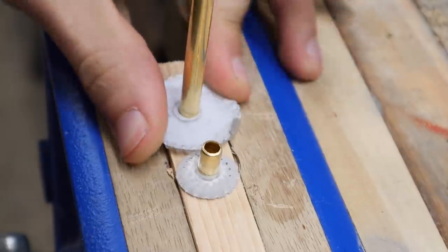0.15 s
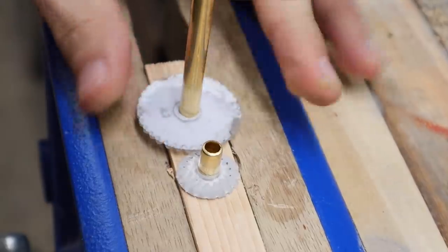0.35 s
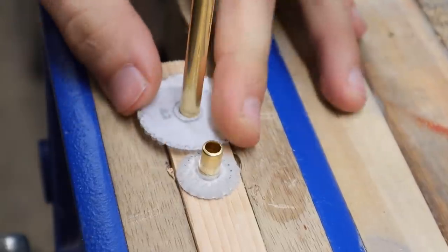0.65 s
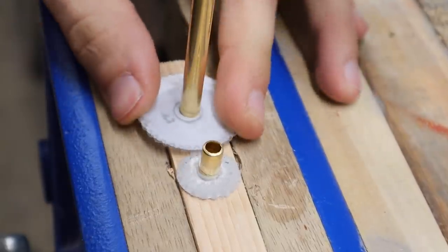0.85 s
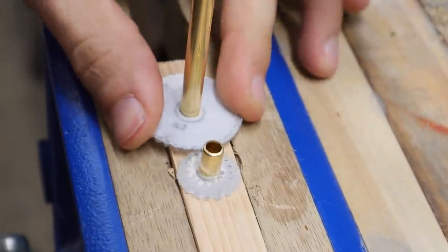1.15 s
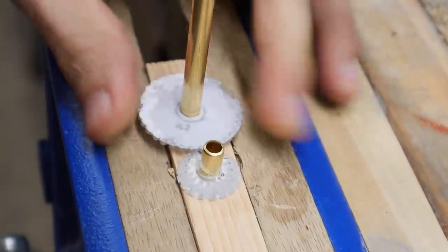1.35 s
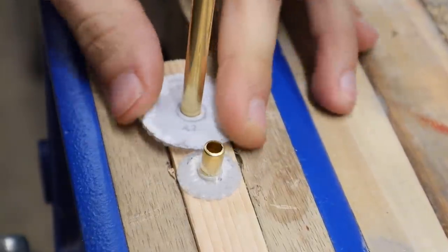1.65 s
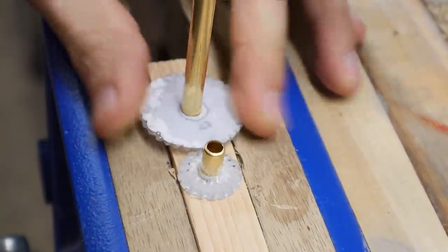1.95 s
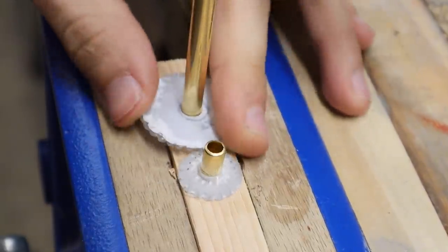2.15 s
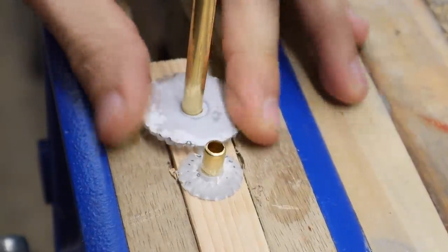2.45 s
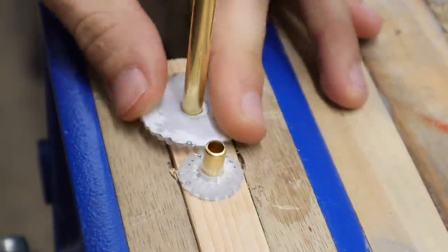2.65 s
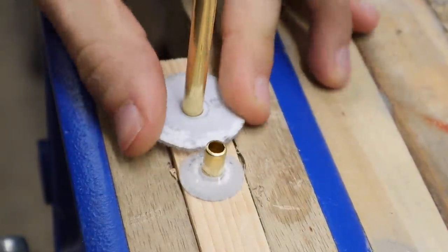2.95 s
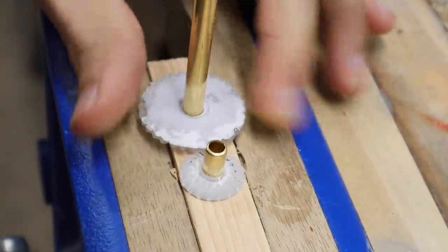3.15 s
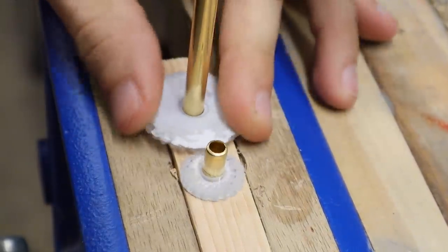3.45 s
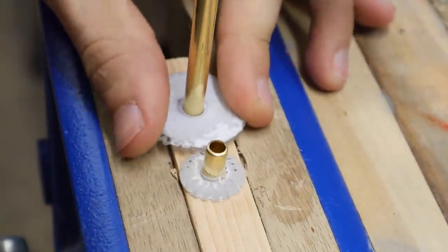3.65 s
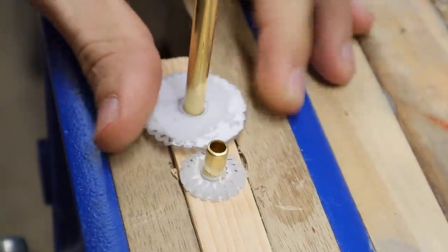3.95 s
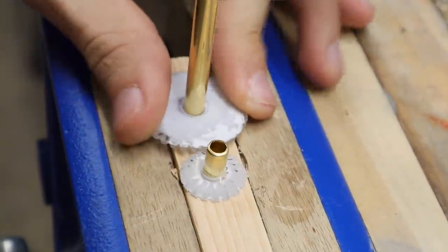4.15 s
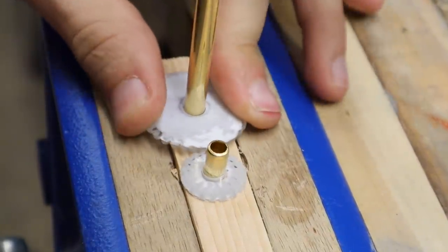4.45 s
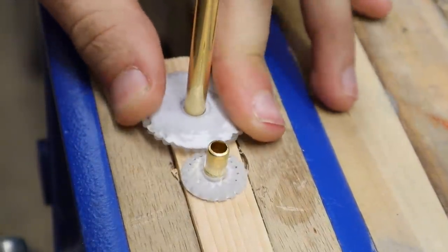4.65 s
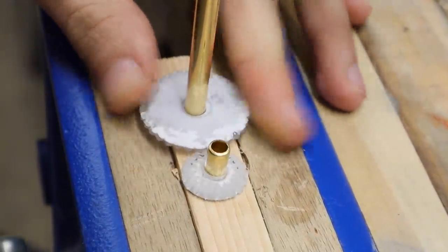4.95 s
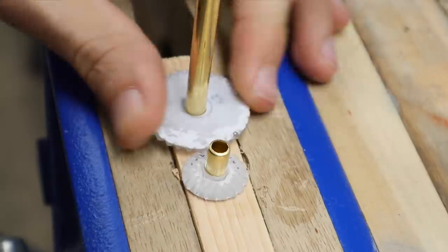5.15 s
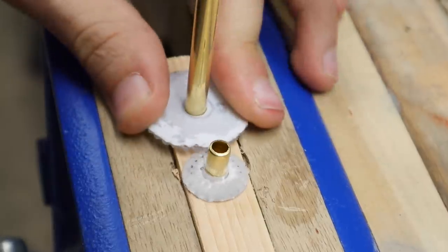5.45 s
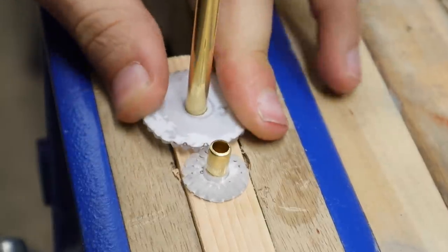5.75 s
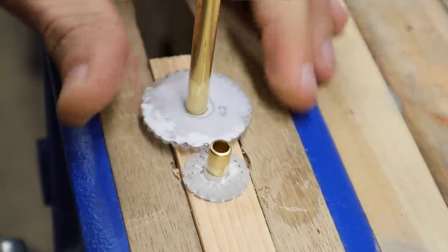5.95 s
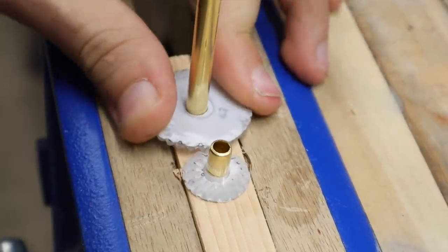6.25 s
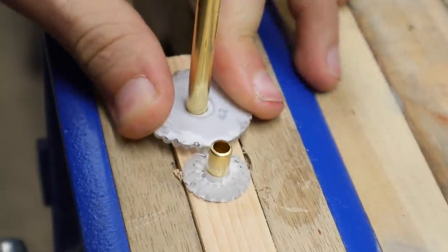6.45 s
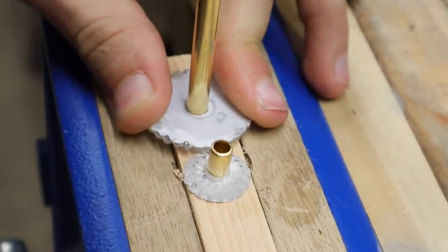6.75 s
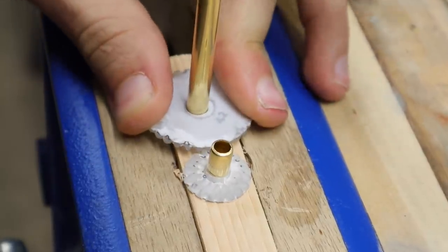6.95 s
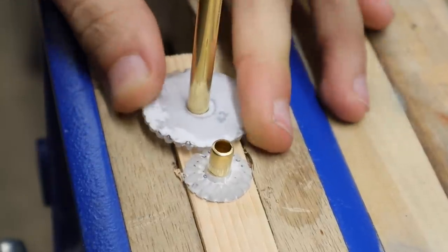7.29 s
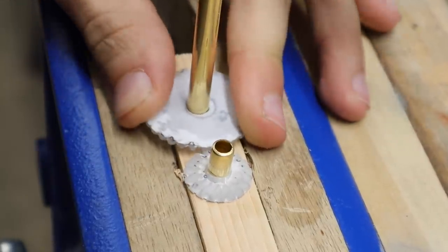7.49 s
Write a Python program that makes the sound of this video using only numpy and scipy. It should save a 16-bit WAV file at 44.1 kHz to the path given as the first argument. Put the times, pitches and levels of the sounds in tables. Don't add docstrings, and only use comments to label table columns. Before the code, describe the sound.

Rough hand-cut gears on brass tubes are turned by hand, teeth jamming and snapping free with sharp metallic clicks, wooden knocks and faint scrapes.

```python
import sys
import numpy as np
from scipy import signal
from scipy.fft import rfft, irfft
from scipy.io import wavfile
from scipy.ndimage import map_coordinates

SR = 44100
rng = np.random.default_rng(int(sys.argv[2]) if len(sys.argv) > 2 else 0)


def generate_wav(signal):
    frames = np.transpose(np.atleast_2d(signal))
    scaled = np.clip(frames, -1, 1) * 32767
    pcm = np.round(scaled).astype(np.int16)
    wavfile.write(sys.argv[1], SR, pcm)


def ratio(d):
    e = np.asarray(d, float) / 20
    return 10 ** e


N = 336042

# start in seconds, disc level in dB,
# share passed to the tubes in dB, hardness as the level change at the very top in dB.
TOOTH_SNAPS = [(0.2035, -11.5, -14, -16), (0.256, -34.5, -18, -18), (0.2664, -37, -22, -15),
               (0.446, -61, -2, -9), (0.4648, -41, -28, -22), (0.4777, -56, -18, 12), (0.9423, -61, 8, 9),
               (1.5232, -45.5, -27, -4), (2.1461, -41, -12, -11), (2.4397, -31, -17.5, -8.5),
               (2.6574, -40.5, -23, -20), (2.9228, -19, -11.5, -17), (2.9304, -29.5, -12, -19),
               (3.3284, -51, -7, 1), (3.4446, -49, -18, -20), (3.4735, -53, -12, -6),
               (3.5718, -31, -26, -28), (3.681, -59, -8, -5), (3.8149, -19, -17, -21),
               (4.1198, -54, -16, 8.5), (4.4644, -50.5, -4, -13), (4.9548, -23, -44, -23),
               (5.1364, -45, -11, -6), (5.157, -51, -3, -14), (5.471, -31, -14.5, -38),
               (6.0736, -40.5, -24, -9), (6.6999, -8, -8, -14.5), (7.231, -50, -12, -17)]
# pitch in Hz, level in dB, time to fall by 60 dB in seconds.
TUBE_MODES = [(1810, -13, .025), (1980, 0, .03), (2060, 0, .035), (2160, -1, .04), (2450, -1, .025),
              (2820, -6, .015)]
DISC_MODES = [(3100, -5, .012), (3270, -2, .02), (3520, 0, .025), (3700, -1, .025), (4150, -2, .025),
              (4450, -6, .012), (4720, -5, .015)]
RING_MODES = [(5150, -3, .016), (5330, 0, .02), (5600, -8, .008), (5950, -9, .008)]
TOP_MODES = [(6400, -4, .008), (6750, 0, .012), (7150, 0, .012), (7500, -3, .01), (8000, -3, .01),
             (8600, -6, .006), (9100, -6, .006), (10700, -3, .008), (12500, -6, .005)]
METAL_SPREAD_DB = 2


def snaps():
    out = np.zeros(N)
    for s, disc_db, tube_db, hard_db in TOOTH_SNAPS:
        force = np.diff(jolt(rise_s=.0004, fall_s=.0006))
        parts = [
            (-2.0, [*DISC_MODES, *crowd(2800, 5000, 0.41, 44.4)]),
            (0.47 * hard_db + 3.0, [*RING_MODES, *crowd(4800, 6500, -1.5, 35.0)]),
            (0.84 * hard_db + 1.0, [*TOP_MODES, *crowd(6603, 9460, 0.5, 73.0)]),
            (hard_db + 4.5, crowd(9500, 16000, 0, 43.0)),
            (tube_db + 9.5, [*TUBE_MODES, *crowd(1960, 2900, 4.0, 25.0)]),
        ]
        for level_db, modes in parts:
            ringing = peak_one(ring(force, modes, METAL_SPREAD_DB, swell_s=0.0012))
            add(out, s - .0002, ratio(disc_db + level_db) * ringing)
        add(out, s, ratio(disc_db - 23.5) * chatter())
    return out


def jolt(rise_s, fall_s):
    t = np.arange(int(.01 * SR)) / SR
    rise = (t / rise_s) ** 2 / (1 + (t / rise_s) ** 2)
    return grit(rise * np.exp(-t / fall_s), 15000, size_db=2.5)


def chatter():
    t60_s, band_hz = 0.093, (1300, 6470)
    t = np.arange(int(.2 * SR)) / SR
    shaking = rms_one(grit(np.ones(len(t)), 6000, size_db=-2.0))
    shaking = shaking * ratio(-60 * t / t60_s) * np.clip(t / 0.0022, 0, 1)
    return signal.sosfilt(signal.butter(1, band_hz, "band", fs=SR, output="sos"), shaking)


# start in seconds, bench level in dB, board level in dB,
# jig level in dB, favoured jig pitch in Hz.
WOOD_KNOCKS = [(0.203, -38.5, -27.5, -25, 1285), (0.467, -58, -62.5, -59, 1030),
               (0.944, -48.5, -51.5, -60, 1090), (1.520, -61, -60.5, -62, 1090),
               (2.15, -57.5, -78, -50.5, 1020), (2.439, -47, -59.5, -44.5, 990),
               (2.547, -50, -76, -69, 1080), (2.923, -41.5, -37.5, -30.5, 1320),
               (2.932, -79, -45, -35.5, 1150), (3.8155, -41.5, -43, -36.5, 1100),
               (4.466, -50, -50, -49, 1070), (4.774, -41.5, -62, -54.5, 1040), (4.953, -44, -51, -39, 1160),
               (5.150, -59, -64, -53, 1040), (5.471, -45, -49, -42, 1080),
               (6.7006, -25.5, -30.5, -23.5, 1120), (7.02, -62, -78, -70, 1070),
               (7.29, -48.5, -58.5, -43.5, 870), (7.578, -63, -57.5, -57, 1080)]
# pitch in Hz, level in dB, time to fall by 60 dB in seconds.
BENCH_MODES = [(70, -12, .25), (95, -8, .3), (140, -9, .2), (190, -6, .15), (225, -8, .12), (255, 1.5, .22),
               (280, -5, .16), (335, -4, .12)]
BOARD_MODES = [(372, -13, .08), (398, -9, .25), (409, 0, .32), (432, -14, .08)]
SLAT_MODES = [(464, 0, .11), (510, -1, .07), (560, -4, .06), (605, -1, .12), (715, -3, .1), (820, -5, .08)]
JIG_MODES = [(955, -4, .12), (1025, -4, .1), (1080, 0, .15), (1131, -4, .12), (1207, -1, .1),
             (1250, -5, .06), (1310, -4, .07), (1440, -4, .08), (1590, -8, .06)]


def knocks():
    free_hz, grip_octaves = 1084, 0.24
    out, push = np.zeros(N), np.ones(3)
    for s, bench_db, board_db, jig_db, jig_hz in WOOD_KNOCKS:
        held = np.clip((jig_hz / free_hz) ** (1 / grip_octaves), .6, 2.5)
        barely_held = held ** .4
        middle_db = (jig_db + bench_db) / 2
        parts = [
            (jig_db + 6.5, near(JIG_MODES, jig_hz, 0.21), held, .004),
            (middle_db + 3.0, SLAT_MODES, held, .0025),
            (jig_db - 0.5, crowd(1300, 1600, 0, 32.0), held, .0012),
            (middle_db + 5, crowd(200, 1000, 0, 7.7), 1, .0006),
            (board_db + 3.0, BOARD_MODES, barely_held, .019),
            (bench_db + 2.5, BENCH_MODES, barely_held, .007),
        ]
        for level_db, modes, damping, swell_s in parts:
            knock = ring(push, modes, 1.5, damping, swell_s)
            add(out, s, ratio(level_db) * peak_one(knock))
    return out


# start in seconds, length in seconds, level in dB,
# 5 kHz ring in dB.
FLANK_GRINDS = [(0.216, 0.1, -52, 5), (0.437, 0.052, -59, 1), (0.61, 0.023, -54, 0),
                (.694, 0.016, -57, -1.5), (0.834, 0.019, -54.5, 7), (0.942, 0.025, -52, 7.5),
                (1.028, .045, -58.5, 12), (1.155, .051, -60.5, 9), (1.274, 0.048, -60.5, 4),
                (1.596, 0.06, -50.5, 3), (1.848, 0.04, -48.5, 5), (1.894, .049, -52, 5.5),
                (2.146, 0.021, -50, -1), (2.231, 0.027, -58.5, -7), (2.356, .15, -62, 6),
                (2.46, 0.07, -57.5, 9), (2.646, .032, -53, 1.5), (3.012, .052, -58, 4),
                (3.125, 0.12, -61, 4), (3.616, 0.17, -59.5, 3), (4.1, .026, -53, 1.5),
                (4.336, 0.025, -59, 3), (4.44, .068, -62, 8), (4.751, 0.038, -53, 0), (4.938, .03, -55, 17),
                (5.144, 0.025, -51, 6), (6.077, .027, -58, -3), (7.288, 0.049, -47.5, -5)]


def grinds():
    out = np.zeros(N)
    for s, length_s, level_db, ring_db in FLANK_GRINDS:
        add(out, s, rub(length_s, level_db, 4400, 1, ring_db))
    return out


# start in seconds, length in seconds, level in dB, 5 kHz ring in dB.
FLANK_SKIDS = [
    (1.518, 0.015, -50, -4),
    (3.802, .008, -48, -3),
    (4.771, 0.012, -41, 6.5),
    (4.947, 0.0076, -38, -6),
    (5.483, 0.0067, -49, -8),
    (7.288, 0.0075, -40.5, 18),
]


def skids():
    out = np.zeros(N)
    for s, length_s, level_db, ring_db in FLANK_SKIDS:
        add(out, s, rub(length_s, level_db, 5050, 1.8, ring_db))
    return out


# start in seconds, length in seconds, level in dB, pitch in Hz,
# spread in octaves.
BURR_DRAGS = [(.467, 0.032, -46.5, 3050, 0.6), (1.614, .029, -42, 7100, 0.36),
              (1.666, .027, -44.5, 4200, 0.054), (2.74, 0.038, -52, 4150, 0.17),
              (3.317, 0.02, -51, 3680, .1), (3.558, .041, -42.5, 3920, 0.11), (3.827, .05, -54, 3500, .09),
              (4.96, .024, -61, 3640, .15), (5.177, .07, -47, 3170, 0.15), (6.665, 0.011, -45.5, 2200, .28),
              (6.721, 0.14, -51, 2300, 0.72), (7.295, 0.042, -46.5, 2140, 0.073)]


def drags():
    out = np.zeros(N)
    for s, length_s, level_db, pitch_hz, octaves in BURR_DRAGS:
        add(out, s, rub(length_s, level_db, pitch_hz, octaves, ring_db=-8))
    return out


def rub(length_s, level_db, favoured_hz, octaves, ring_db):
    progress = np.arange(int(.2 * SR)) / SR / max(length_s, .005)
    pressure = np.sin(np.pi * np.clip(progress, 0, 1) ** 0.55) ** .55 * (progress < 1)
    force = grit(pressure, 2200, size_db=1.0)
    force = force / np.sqrt(np.sum(force ** 2) / (length_s * SR) + 1e-12)
    modes = [*TUBE_MODES, *DISC_MODES, *TOP_MODES,
             *crowd(1520, 5000, -0.25, 25.0), *crowd(4970, 15000, -0.19, 52.0)]
    scrape = ratio(level_db - 31.0) * ring(force, near(modes, favoured_hz, octaves), METAL_SPREAD_DB)
    bright = ratio(level_db + ring_db - 31.0) * ring(force, RING_MODES, METAL_SPREAD_DB)
    out = np.zeros(max(len(scrape), len(bright)))
    out[:len(scrape)] += scrape
    out[:len(bright)] += bright
    return out


def ring(force, modes, spread_db, damping=1, swell_s=1e-5):
    hz, level_db, t60 = np.transpose(modes)[:, :, None]
    t = np.arange(int(np.max(t60) / damping * SR) + 9) / SR
    sign = (-1) ** np.round(hz / 50)
    strength = ratio(level_db + spread_db * rng.standard_normal(hz.shape)) * sign
    tones = strength * ratio(-60 * damping * t / t60) * np.sin(2 * np.pi * hz * t)
    swell = 1 - np.exp(-(t / swell_s) ** 2)
    return signal.fftconvolve(force, np.sum(tones, axis=0) * swell)


def crowd(low_hz, high_hz, level_db, cycles):
    count = 18
    place = (np.arange(count) + rng.random(count)) / count
    hz = low_hz * (high_hz / low_hz) ** place
    return [(f, level_db, cycles / f) for f in hz]


def near(modes, favoured_hz, octaves):
    modes = np.array(modes, float)
    distance = np.log2(modes[:, 0] / favoured_hz) / max(octaves, .05)
    modes[:, 1] -= np.minimum(3 * distance ** 2, 40)
    return modes


def grit(envelope, per_s, size_db):
    count = len(envelope)
    caught = rng.random(count) < per_s / SR
    sizes = ratio(size_db * np.minimum(rng.exponential(1, count), 4))
    return envelope * caught * sizes * rng.choice([-1, 1], count)


def add(track, s, sound):
    i = max(round(s * SR), 0)
    track[i:i + len(sound)] += sound[:N - i]


def peak_one(x):
    return x / (np.max(np.abs(x)) + 1e-20)


def rms_one(x):
    return x / np.sqrt(np.mean(x ** 2) + 1e-20)


# pitch in Hz, time to fall by 60 dB in seconds.
SHOP_DECAY = [(200, 0.24), (1000, 0.091), (3000, 0.14), (6000, 0.13), (12000, 0.12)]
# pitch in Hz, level in dB.
SHOP_TONE = [(200, 5.5), (1000, 11), (2000, 8), (3000, 2.5), (6000, -1.5), (7000, -14), (16000, -18)]


def shop(x):
    t = np.arange(int(.5 * SR)) / SR
    edges = 100 * 2 ** np.arange(0, 7.6, .5)
    white, tail = rng.standard_normal(len(t)), 0
    for low, high in zip(edges, edges[1:]):
        band = signal.sosfilt(signal.butter(2, [low, high], "band", fs=SR, output="sos"), white)
        tail = tail + band * ratio(at_hz(SHOP_TONE, low) - 60 * t / at_hz(SHOP_DECAY, low))
    tail = tail * np.clip((t - .003) / 0.00099, 0, 1)
    return signal.fftconvolve(x, tail / np.sqrt(np.sum(tail ** 2)))[:N]


# time in seconds, level in dB.
HUM_LOAD = [
    (0, -49.5),
    (.5, -52.5),
    (1.9, -52.5),
    (4.8, -54.5),
    (5.1, -50),
    (5.5, -52),
    (6.7, -49.5),
    (7.62, -51.5),
]
# multiple of the base pitch, level in dB.
WHINE_TONES = [
    (1, -59.5),
    (2, -76.5),
    (3, -75.5),
]
# pitch in Hz, width in Hz, level in dB.
DRONE_TONES = [
    (91.2, 2.8, -69),
    (1050, 0.93, -70.5),
]
# pitch in Hz, level in dB per Hz.
AIR_SPECTRUM = [(12, -27), (30, -12.5), (45, -15), (95, -13), (120, -15), (240, -16), (500, -21),
                (760, -19), (1000, -15.5), (1300, -20), (1700, -23.5), (4000, -29), (9000, -33.5),
                (16000, -33.5)]


def machines():
    hum_hz, whine_hz = 59.7, 853.1
    t = np.arange(N) / SR
    s, load_db = np.transpose(HUM_LOAD)
    hum_db = np.interp(t, s, load_db) + 2.0 + 2.2 * drift(3.6)
    hum = np.sin(2 * np.pi * hum_hz * t + 0.73 * drift(1.5)) * ratio(hum_db)
    whine = sum(ratio(db + 2.5) * np.sin(2 * np.pi * whine_hz * k * t + k) for k, db in WHINE_TONES)
    whine = whine * ratio(1.24 * drift(8.9))
    drones = np.zeros(N)
    for hz, width_hz, db in DRONE_TONES:
        level = ratio(db + 3 + 2 * drift(width_hz))
        drones += level * np.sin(2 * np.pi * hz * t + drift(width_hz))
    air = coloured(AIR_SPECTRUM) * ratio(-53.0 + .5 * drift(8.4))
    return hum + whine + drones + air


# pitch in Hz, level in dB per Hz.
HISS_SPECTRUM = [(100, -24), (300, -3.5), (700, -1.5), (850, -11), (1500, -8), (3500, -4), (9000, -5),
                 (16000, -5.5)]


def capsule_hiss():
    return ratio(-69.5) * coloured(HISS_SPECTRUM) * [[1], [-1]]


def coloured(spectrum):
    hz = np.fft.rfftfreq(N, 1 / SR)
    return rms_one(irfft(rfft(rng.standard_normal(N)) * ratio(at_hz(spectrum, hz)), N))


def drift(rate):
    knots = rng.standard_normal(400)
    return rms_one(map_coordinates(knots, [10 + np.arange(N) / SR * rate * 2], order=3))


def at_hz(points, hz):
    table_hz, values = np.transpose(points)
    return np.interp(np.log(hz + 1), np.log(table_hz), values)


def scene():
    no_bass = signal.butter(2, 55, "high", fs=SR, output="sos")
    gears = signal.sosfilt(no_bass, snaps() + knocks() + grinds() + skids() + drags())
    gears = gears - .45 * signal.lfilter(*signal.iirpeak(1720, 8, fs=SR), gears)
    return np.tile(gears + ratio(-18.0) * shop(gears) + machines(), (2, 1))


def band_limit(x):
    return signal.sosfilt(signal.butter(12, 16430, fs=SR, output="sos"), x)


def record(dry):
    rounded = .9 * np.tanh((dry + capsule_hiss()) / .9)
    top_cut = signal.cheby2(10, 45, 16200, fs=SR, output="sos")
    finished = signal.sosfilt(top_cut, rounded) + .0005
    return band_limit(finished)


dry = scene()
out = record(dry)
generate_wav(out)
```